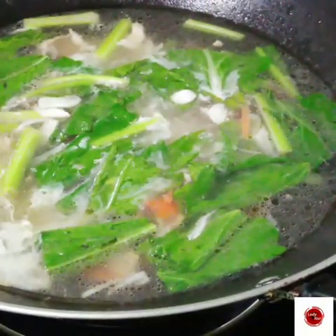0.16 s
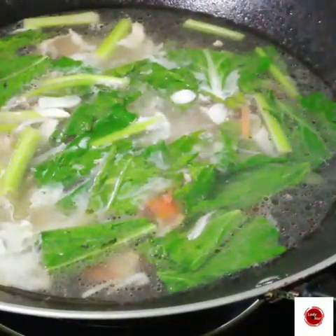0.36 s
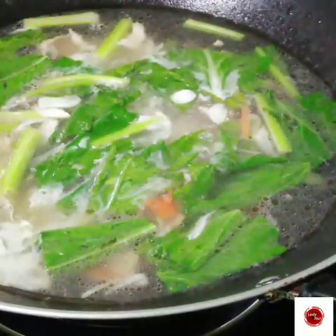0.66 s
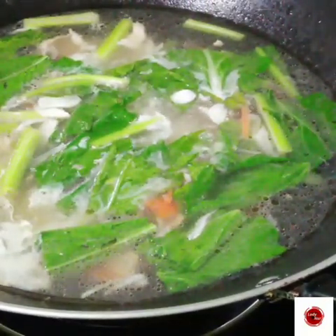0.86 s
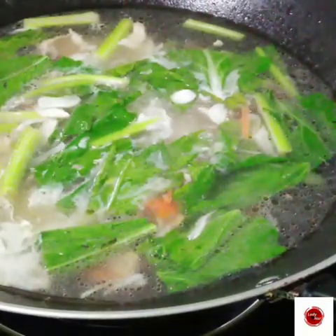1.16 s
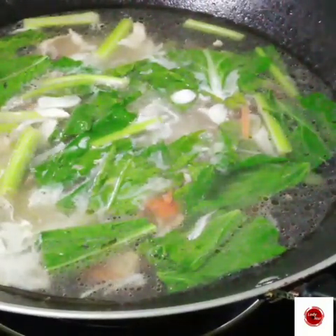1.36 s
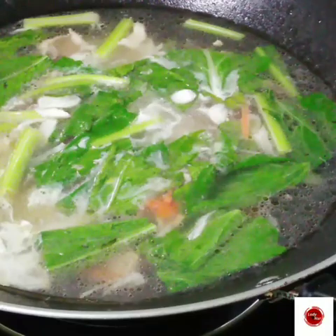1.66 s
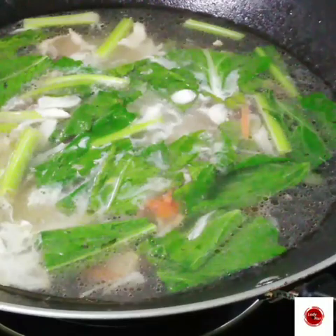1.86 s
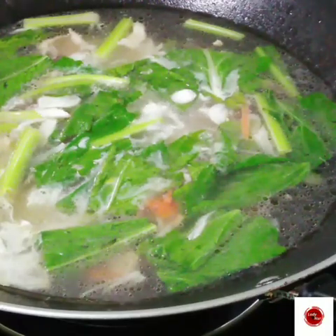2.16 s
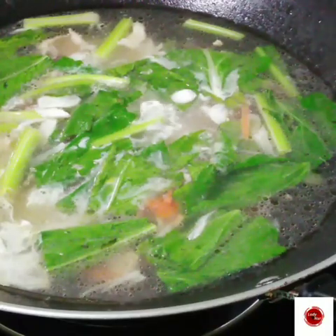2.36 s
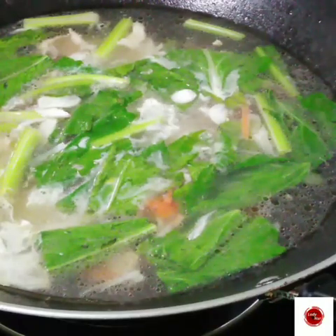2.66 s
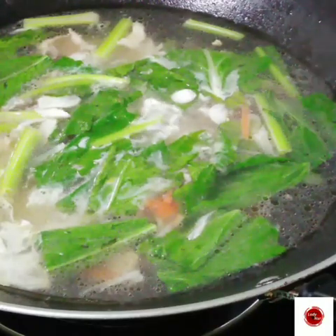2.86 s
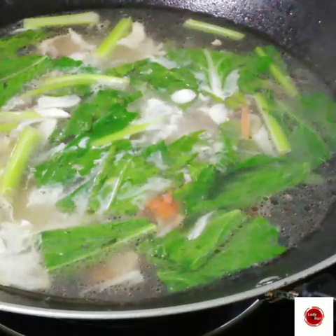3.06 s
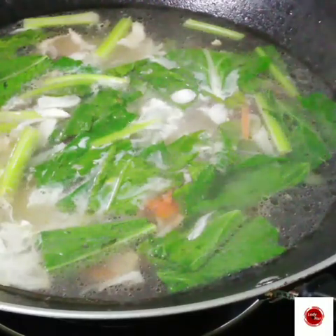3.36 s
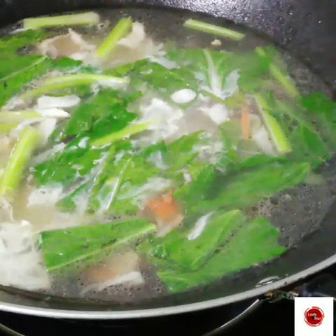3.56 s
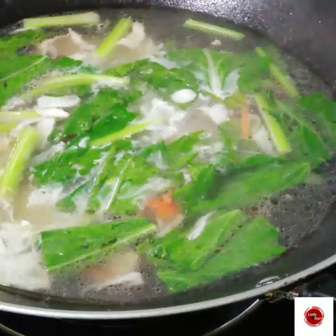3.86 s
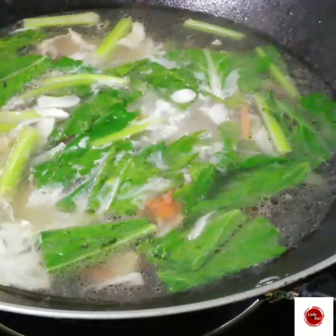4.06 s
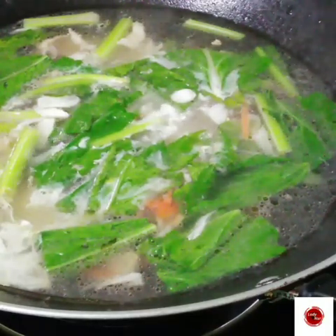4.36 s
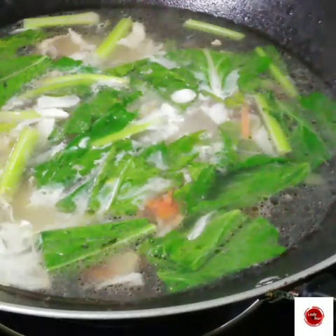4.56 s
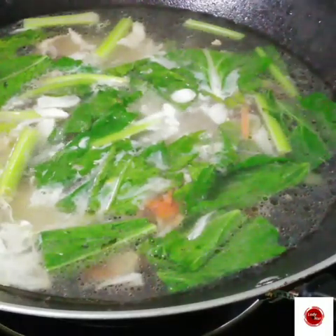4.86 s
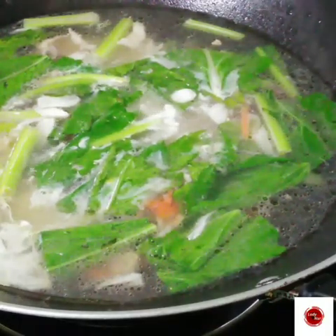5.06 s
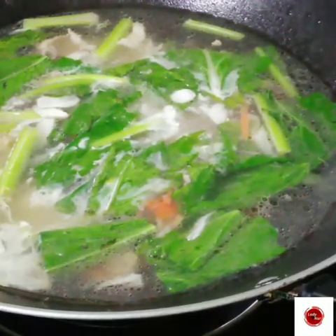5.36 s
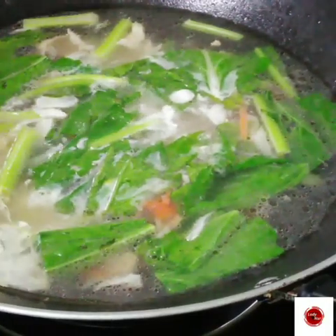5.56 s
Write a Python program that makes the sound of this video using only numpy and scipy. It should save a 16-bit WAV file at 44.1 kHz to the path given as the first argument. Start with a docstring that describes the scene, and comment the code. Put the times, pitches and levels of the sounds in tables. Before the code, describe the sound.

Broth simmers in a pan, spitting and hissing strongly at first, then calming to scattered bubble plops, with a brief rising squeak midway.

```python
"""Simmering broth

Steam hiss surges and spits, dense tiny bubbles fizz and large ones rumble: coloured grainy noise.
Plops are damped sines; a squeak climbs in pitch and a sputter breaks up: roughened tones.
A hum sags early on, a thin whistle wavers late, dry ticks snap and a modal thud lands once.
An even burner hiss and room air lie under it all; sparse taps echo the plops, snaps and thud."""
import sys
import numpy as np
from scipy import signal
from scipy.io import wavfile
from scipy.ndimage import uniform_filter1d

SR = 44100
rng = np.random.default_rng(int(sys.argv[2]) if len(sys.argv) > 2 else 0)


def waveform_to_disk(signal):
    """Save audio, clipped to [-1, 1], as 16-bit WAV at the path in sys.argv[1]."""
    frames = np.transpose(np.atleast_2d(signal))
    scaled = np.clip(frames, -1, 1) * 32767
    samples = np.round(scaled).astype(np.int16)
    wavfile.write(sys.argv[1], SR, samples)


N = 252604

# Noise spectra, relative. Each row: frequency in Hz, density in dB per Hz.
ROOM_COLOUR = [(12, -49), (35, -4), (130, 1.5), (170, -15), (290, -120)]
BURNER_COLOUR = [(600, -30), (770, 6), (920, -24.5), (1800, -17), (2000, 3), (2250, -28), (7000, -36),
                 (7700, -0.5), (8400, 14.5), (9000, -7.5), (9500, -27), (10000, 9), (10400, -35.5),
                 (11500, -75)]
DEEP_COLOUR = [(50, -53.5), (86, 4), (124, -14.5), (173, 2.5), (227, -3.5), (270, -2), (360, -21),
               (470, -36), (790, -120)]
UPPER_COLOUR = [(240, -4), (320, 2.5), (450, 0.5), (560, 2), (720, 4), (860, -2.5), (1000, -10),
                (1300, -17), (2400, -100)]
FIZZ_COLOUR = [(470, -60), (800, 2), (987, -7.5), (1250, 0), (2040, 3.5), (2290, 0), (2750, 1),
               (3910, -5.5), (6500, -4.5), (8450, -56)]
STEAM_COLOUR = [(1760, -37), (3000, -10.5), (3500, -14), (4340, -8.5), (6130, -1), (7700, 7.5), (8520, 6.5),
                (13700, -19), (14600, -16.5)]
# Stereo likeness of the noises. Each row: frequency in Hz, left-right correlation (0-1).
LIKENESS = [(60, 0.985), (130, .98), (290, 0.88), (640, 0.5), (1400, 0.05), (14900, 0.03)]
# Stereo balance of the noises. Each row: frequency in Hz, left over right in dB.
TILT = [(300, 1), (1500, -0.5), (5500, -2.5), (7300, -11.5), (8700, 2.5), (12000, 1.5)]
# Hum level. Each row: time in seconds, level in dB.
HUM = [(0, -47), (.13, -60.5), (.36, -39.5), (.48, -44), (.56, -36), (.62, -35), (.64, -53), (.74, -47.5),
       (.92, -54), (1.0, -51), (1.25, -55)]
# Whistle path. Each row: time in seconds, centre in Hz, level in dB.
WHISTLE = [(5.05, 2990, -58.5), (5.192, 3090, -63), (5.212, 3230, -54), (5.6, 3160, -59),
           (5.728, 3400, -69)]
# Whistle bands. Each row: multiple of the centre, relative level in dB.
WHISTLE_BANDS = [(1, -4.5), (2, -5.5), (2.5, -2)]
# Thud modes. Each row: frequency in Hz, relative level in dB, t60 in seconds.
THUD_MODES = [(120.5, 0.5, 0.2), (167, 7.5, 0.12), (211, 3, 0.11), (298, -2, 0.13), (405, -7, 0.1)]
# Squeak path. Each row: time in seconds, pitch in Hz, level in dB.
SQUEAK = [(3.206, 720, -78), (3.209, 727, -42.5), (3.23, 890, -51), (3.247, 1290, -34), (3.26, 1560, -56),
          (3.28, 1925, -42.5), (3.305, 2060, -46), (3.32, 2152, -41), (3.335, 2244, -48),
          (3.389, 2437, -39)]
# Sputter level. Each row: time in seconds, level in dB.
SPUTTER = [(2.97, -81), (2.99, -48), (3.035, -56), (3.068, -40.5), (3.085, -68), (3.139, -46.5),
           (3.168, -38), (3.19, -72)]
# Snaps of a bursting skin. Each row: start in seconds, level in dB, left over right in dB.
TICKS = [(3.2086, -34, 1.5), (3.839, -31, 3), (4.5125, -31, 6), (4.9553, -38, 2)]
# Plops. Each row: start in seconds, level in dB, pitch in Hz, t60 in seconds, left over right in dB.
PLOPS = [(.676, -20, 433, 0.083, -1), (1.361, -34, 337, 0.045, -6), (1.493, -28, 480, 0.03, -8),
         (1.768, -29, 635, 0.057, -5), (2.278, -31, 640, 0.017, 8.5), (2.284, -26, 717, 0.015, 1),
         (2.305, -26, 669, 0.034, 3), (2.309, -20.5, 564, 0.041, 8), (2.307, -30.5, 1450, 0.035, 12),
         (2.316, -27, 795, 0.026, 3), (2.342, -29.5, 610, 0.016, -7), (2.352, -33, 619, 0.026, -2),
         (2.694, -31, 363, 0.037, 4.5), (2.699, -48, 2020, 0.026, 5), (2.791, -46.5, 2020, 0.031, 0),
         (2.878, -41.5, 347, 0.06, 1), (3.462, -36, 1845, 0.028, 4), (4.207, -41, 1937, 0.052, -17),
         (4.341, -29, 533, 0.043, 2), (4.351, -28.5, 618, 0.047, -2), (4.374, -37, 596, 0.031, 2),
         (4.427, -43.5, 1940, 0.072, 8), (4.881, -36.5, 760, 0.043, 3), (4.899, -36, 797, 0.035, 0),
         (4.9552, -27.5, 1904, 0.015, -3), (4.9555, -34, 696, 0.012, 2), (4.957, -44, 3890, 0.024, 0),
         (5.172, -31.5, 234, 0.023, 5.5), (5.226, -25.5, 1558, 0.037, -2.5), (5.457, -33.5, 684, 0.043, 6)]
# Level of the deep rumble throughout, apart from what the surges add. Each row: time in seconds, level in dB.
DEEP = [(0, -54.5), (.16, -55), (.24, -45), (.71, -41), (.88, -54.5), (1.0, -44), (1.34, -61), (1.53, -51),
        (1.75, -63.5), (2.17, -72.5), (2.24, -62), (2.83, -66.5), (2.91, -56.5), (3.25, -65.5), (3.36, -58),
        (4.3, -63.5), (4.81, -66), (5.1, -76), (5.17, -58), (5.73, -64)]
# Quiet simmer. Each row: time in seconds, then steam, fizz and upper rumble levels in dB.
SIMMER = [(0, -46, -59.5, -51), (.2, -49.5, -53, -58), (.45, -40.5, -48.5, -44), (.92, -47, -56.5, -49),
          (1.2, -46, -54.5, -55.5), (1.45, -59.5, -72.5, -62), (1.7, -52, -68, -59.5),
          (1.986, -58, -82, -60), (2.015, -69, -76.5, -65.5), (2.179, -85, -77, -71),
          (2.4, -51.5, -98, -56.5), (2.66, -64, -107, -69), (2.81, -64.5, -67.5, -70),
          (3.2, -56.5, -66.5, -77), (3.55, -55, -68, -76.5), (3.92, -88, -93, -79.5),
          (4.2, -55.5, -104, -76), (4.72, -65.5, -79, -89), (5.04, -76, -66, -86), (5.3, -59, -63.5, -72),
          (5.73, -79, -90, -70)]
# Surges of the boil. Each row: crest in seconds, rise in seconds, hold in seconds, fall in dB per second,
# steam, fizz and upper rumble levels in dB, left over right of the steam in dB.
SURGES = [(0.218, 0.0083, .005, 192, -40, -54, -40.5, -8.5),
          (0.339, 0.14, 0.0065, 138, -30, -36.5, -37.5, 5),
          (0.517, 0.078, 0.27, 600, -36, -47.5, -42.5, 3.5), (0.99, 0.15, 0.0056, 91, -43, -48.5, -38.5, 2),
          (1.102, 0.51, 0.004, 223, -33, -52, -49, 2.5), (1.365, 0.015, 0.0042, 116, -50, -57, -46.5, 6),
          (1.498, 0.062, 0.054, 228, -51, -43.5, -41.5, 5), (1.76, 0.13, 0.041, 135, -40, -45, -49, 10.5),
          (2.301, 0.068, 0.0027, 133, -41, -44, -52.5, 7), (2.689, 0.044, 0.0074, 385, -56, -57, -53, 8),
          (2.996, 0.12, .16, 264, -58, -51, -54.5, 6.5), (3.286, 0.083, .01, 112, -55, -47, -86, -10),
          (3.454, 0.037, .005, 134, -57.5, -55.5, -75, 16), (3.597, 0.1, 0.0088, 50, -45.5, -60, -91, 11),
          (3.836, 0.0055, 0.039, 456, -71.5, -52, -81, 36), (3.988, 0.16, 0.13, 60, -62.5, -59, -69, -1),
          (4.267, 0.089, 0.045, 91, -43.5, -56.5, -90, 9), (4.333, 0.033, 0.0057, 123, -63, -46, -47, 3),
          (4.509, 0.015, 0.052, 80.5, -53, -50, -60, 0), (4.884, 0.083, 0.0053, 180, -56.5, -57, -51.5, 6),
          (5.052, 0.008, 0.05, 60, -63.5, -66, -75, -7), (5.382, 0.56, 0.0046, 38, -52, -64, -59.5, 9.5),
          (5.57, 0.07, 0.0076, 212, -54.5, -65, -90.5, 11)]
# Sudden spits of steam. Each row: start in seconds, nominal noise peak in dB, t60 in seconds,
# left over right in dB, lower hiss over upper hiss in dB.
SPITS = [(.113, -34, 0.21, 0, 15.5), (0.215, -23.5, 0.26, 1, 7), (0.2927, -26, 0.15, -2, -10),
         (0.326, -18.5, 0.35, 2.5, 12.5), (0.4035, -16, 0.07, -2, -11), (0.506, -19, 0.18, 2, 7),
         (0.542, -25.5, 0.49, 2, 11), (0.629, -15, 0.11, 7, -15), (0.676, -18, 0.31, -1, 2.5),
         (.894, -19, 0.022, -5, -13), (0.9266, -24.5, 0.35, 4, -13), (0.957, -17.5, 0.16, 2, 6),
         (1.0875, -14, 0.099, 0, -9), (1.106, -19.5, 0.13, -1, 4), (1.4283, -26, 0.22, -4, -7),
         (1.487, -21.5, 0.16, 6, -12), (1.515, -20.5, 0.21, 1.5, -14), (1.747, -22, 0.046, 7.5, 3),
         (2.209, -39, 0.25, 13, -18), (2.2336, -34, 0.2, 9, -15), (2.285, -30.5, 0.2, 13, 0),
         (2.945, -35, 0.057, 11, -21), (4.2093, -37, 0.097, -0.5, 14.5), (4.2857, -26, 0.062, 3, 3),
         (4.335, -28.5, 0.16, 13, -5), (4.508, -37.5, 0.35, 9, 4), (5.477, -37, .04, 3, 2),
         (5.576, -28.5, 0.037, 5, 4)]

ROOM_DB, BURNER_DB = -66, -64
HUM_HZ, HUM_SAG_HZ_PER_S = 471, 41
THUD_S, THUD_PEAK_DB = 5.3245, -26
SPUTTER_HZ = 1980
CLEAN_HZ, BROKEN_HZ, CLEAN_SHARE, BROKEN_SHARE = 1810, 1993, 0.36, 1  # break-up grows between the pitches
SWELL_SHARE = 0.1  # plop swell time as a share of t60
RISE_DB = 51.5  # climb of a surge over its rise time
SIMMER_PAN_DB = 8.5  # left over right, steam only
DEEP_SURGE_DB = -16.5  # deep rumble against the upper rumble level
SPIT_FIZZ_DB = -20.5  # fizz of a spit against its lower hiss
LOW_CUT_HZ, EDGE_HZ = 40, 14450
SUPPRESS_SHARE, DEPTH_DB = 0.43, -4.5  # share of quiet power removed; deepest cut


def gain_of(db):
    """Amplitude factor of a level in dB."""
    return 10 ** (np.asarray(db) / 20)


def evened(x):
    """Scale to unit rms."""
    return x / np.sqrt(np.mean(x ** 2) + 1e-20)


def read(points, hz):
    """Interpolate a table over log frequency."""
    f, value = np.transpose(points)
    return np.interp(np.log(hz + 1), np.log(f + 1), value)


def curves(rows):
    """Columns of a time table at every sample."""
    s, *columns = np.transpose(rows)
    return [np.interp(np.arange(N) / SR, s, c) for c in columns]


def panned(db):
    """Left and right gains, db apart."""
    return gain_of(np.array([db / 2, -db / 2]))


def add(mix, s, sound):
    """Mix a stereo sound in at s seconds, cut at the end."""
    part = mix[:, round(s * SR):][:, :sound.shape[1]]
    part += sound[:, :part.shape[1]]


def smooth_noise(shape, width_s):
    """Unit-rms noise averaged over width_s along its last axis."""
    return evened(uniform_filter1d(rng.standard_normal(shape), round(width_s * SR)))


def wash(colour, size, patchy_db, streaky_db, crackle_db, per_s):
    """Stereo noise of sparse ticks over a smooth bed, coloured and patched in short-time spectra."""
    strengths = gain_of(3.5 * np.minimum(rng.exponential(1, (2, N)), 2.2))
    grains = strengths * (rng.random((2, N)) < per_s / SR)
    raw = rng.standard_normal((2, N)) * (1 + gain_of(crackle_db) * evened(grains))
    hz, t, (a, b) = signal.stft(raw, SR, nperseg=size, noverlap=size * 3 // 4)
    same = read(LIKENESS, hz)[:, None]
    z = np.array([a, same * a + np.sqrt(1 - same ** 2) * b])
    z *= panned(read(TILT, hz))[:, :, None]

    cells, thin = rng.standard_normal((len(t), len(hz), 2)).T
    patches = uniform_filter1d(cells, size // 64, axis=0)
    patches = evened(uniform_filter1d(patches, 8192 // size, axis=1))
    streaks = uniform_filter1d(thin, size // 400, axis=0)
    streaks = evened(uniform_filter1d(streaks, 24576 // size, axis=1))
    streaks = np.minimum(streaks, 1.1)  # narrow bands dip deeper than they rise
    patch_db = patchy_db * np.tanh(patches / 2) * 2
    z *= gain_of(read(colour, hz)[:, None] + patch_db + streaky_db * streaks)
    out = signal.istft(z, SR, nperseg=size, noverlap=size * 3 // 4)[1][:, :N]
    return out / np.sqrt(np.mean(out.mean(0) ** 2))  # unit rms of the left-right mean


def tone(rows, waver_hz, flutter_db, grain_s):
    """A sine on a pitch and level path, both wavering at random."""
    hz, db = curves(rows)
    waver, flutter = smooth_noise(N, grain_s), smooth_noise(N, grain_s)
    t = np.arange(N) / SR
    fade_in = np.clip((t - rows[0][0]) / 0.0047, 0, 1)
    fade_out = np.clip((rows[-1][0] - t) / 0.038, 0, 1)
    turns = np.cumsum(hz + waver_hz * waver) / SR
    level = gain_of(db + flutter_db * flutter)
    return np.sqrt(2) * fade_in * fade_out * level * np.sin(2 * np.pi * turns)


def room_air():
    """Still air of the room: low noise at a constant level."""
    return gain_of(ROOM_DB) * wash(ROOM_COLOUR, size=2048, patchy_db=2.5, streaky_db=0.5,
                                   crackle_db=-1, per_s=170)


def burner():
    """Thin burner hiss at a constant level, with two faint lower bands."""
    return gain_of(BURNER_DB) * wash(BURNER_COLOUR, size=1024, patchy_db=1.5, streaky_db=4,
                                     crackle_db=-12, per_s=1500)


def kitchen(x, t60=0.17):
    """Echoes: sparse taps of random sign that die away, drawn separately for each side."""
    t = np.arange(SR // 3) / SR
    signs = rng.choice([-1., 1.], (2, len(t)))
    present = (rng.random((2, len(t))) < .05) * (t > .004)
    taps = signs * present * gain_of(-60 * t / t60)
    return signal.fftconvolve(x, taps / np.linalg.norm(taps[0]), axes=1)[:, :N]


def hum():
    """A wavering tone that sags in pitch."""
    path = [(s, HUM_HZ - HUM_SAG_HZ_PER_S * s, db) for s, db in HUM]
    return tone(path, waver_hz=9.3, flutter_db=3.5, grain_s=0.025)


def whistle():
    """Fast-wavering sines smear into thin hissy bands at fixed ratios, drawn separately for each side."""
    bands = [[(s, k * hz, db + rel_db) for s, hz, db in WHISTLE] for k, rel_db in WHISTLE_BANDS]
    return np.array([sum(tone(rows, waver_hz=85.6, flutter_db=4.5, grain_s=0.005) for rows in bands)
                     for side in "LR"])


def thud():
    """One soft blow on a few low damped modes."""
    out, t = np.zeros((2, N)), np.arange(SR // 3) / SR
    ring = sum(gain_of(db - 60 * t / t60) * np.sin(2 * np.pi * hz * t) for hz, db, t60 in THUD_MODES)
    soft = ring * (1 - np.exp(-(t / 0.0018) ** 2))
    add(out, THUD_S, gain_of(THUD_PEAK_DB) * np.array([soft, soft]) / abs(soft).max())
    return out


def squeak(rows, chop_s=.0018):
    """Air escapes through a closing gap: noise chops the note more the higher its pitch."""
    note = tone(rows, waver_hz=15, flutter_db=.8, grain_s=.004)
    broken = np.interp(curves(rows)[0], [CLEAN_HZ, BROKEN_HZ], [CLEAN_SHARE, BROKEN_SHARE])
    return note * (np.sqrt(1 - broken ** 2) + broken * smooth_noise((2, N), chop_s))


def sputter():
    """The same broken note held at one pitch, in bursts."""
    return squeak([(s, SPUTTER_HZ, db) for s, db in SPUTTER])


def ticks(width_s=.00009):
    """A skin bursts: one short push and pull of air each."""
    out, u = np.zeros((2, N)), np.arange(200) / SR / width_s
    pulse = u * (2 - u) * np.exp(-u) * 2
    for s, db, pan_db in TICKS:
        add(out, s, panned(pan_db)[:, None] * gain_of(db) * pulse)
    return out


def plops(rise_per_s=4.4, splash_db=-9, splash_s=0.00086):
    """A bubble swells, rings at a slightly rising pitch, roughened by its splash, and dies."""
    out, t = np.zeros((2, N)), np.arange(SR // 5) / SR
    splashes = smooth_noise((len(PLOPS), 2, len(t)), splash_s)
    for (s, db, hz, t60, pan_db), splash in zip(PLOPS, splashes):
        swell = 1 - np.exp(-(t / (SWELL_SHARE * t60)) ** 2)
        shape = gain_of(db - 60 * t / t60) * swell
        ring = np.sin(2 * np.pi * hz * (t + rise_per_s * t ** 2 / 2))
        add(out, s, panned(pan_db)[:, None] * shape * (1 + gain_of(splash_db) * splash) * ring)
    return out


def surges():
    """Levels of steam, fizz and upper rumble: each surge climbs, holds and falls over the quiet simmer."""
    t = np.arange(N // 32 + 2) * 32 / SR  # every 32nd sample
    s, *quiet = np.transpose(SIMMER)
    hiss, froth, upper = (gain_of(np.interp(t, s, db)) ** 2 for db in quiet)  # powers
    hiss = hiss * panned(SIMMER_PAN_DB)[:, None] ** 2
    for crest, rise, hold, fall, hiss_db, fizz_db, upper_db, pan_db in SURGES:
        climb_db = -RISE_DB * np.maximum(crest - t, 0) / rise
        fall_db = -fall * np.maximum(t - crest - hold, 0)
        power = gain_of(climb_db + fall_db) ** 2
        hiss = hiss + power * (gain_of(hiss_db) * panned(pan_db)[:, None]) ** 2
        froth = froth + power * gain_of(fizz_db) ** 2
        upper = upper + power * gain_of(upper_db) ** 2
    left, right, froth, upper = (np.interp(np.arange(N) / SR, t, np.sqrt(v))
                                 for v in (*hiss, froth, upper))
    return np.array([left, right]), froth, upper


def spits(crest_db=12):
    """Levels of upper hiss, lower hiss and fizz: each spit jumps up, then dies away."""
    (hiss, low), t = np.zeros((2, 2, N)), np.arange(SR // 3) / SR
    for s, peak_db, t60, pan_db, low_db in SPITS:
        rms_db = peak_db - crest_db  # noise peaks stand above the rms
        shape = gain_of(rms_db - 60 * t / t60) * (1 - np.exp(-t / 0.001))
        burst = panned(pan_db)[:, None] * shape
        add(hiss, s, burst)
        add(low, s, gain_of(low_db) * burst)
    return hiss, low, gain_of(SPIT_FIZZ_DB) * low


def boil(surge, spat):
    """Large bubbles collapse under the surface: a deep and an upper rumble."""
    deep = wash(DEEP_COLOUR, size=2048, patchy_db=2.5, streaky_db=3, crackle_db=-13, per_s=200)
    upper = wash(UPPER_COLOUR, size=1024, patchy_db=2, streaky_db=4.5, crackle_db=-11, per_s=230)
    upper_level = np.sqrt(surge ** 2 + (gain_of(-31) * spat.mean(0)) ** 2)
    deep_level = np.sqrt(gain_of(curves(DEEP)[0]) ** 2 + (gain_of(DEEP_SURGE_DB) * surge) ** 2)
    return deep_level * deep + upper_level * upper


def fizz(surge, spat):
    """Small bubbles burst densely, louder in surges and spits."""
    level = np.sqrt(surge ** 2 + spat ** 2)
    return level * wash(FIZZ_COLOUR, size=1024, patchy_db=2.5, streaky_db=7, crackle_db=-8, per_s=1200)


def steam(surge, spat, spat_low):
    """Hiss follows surges and spits; above about 10 kHz it is turned down where the level is low."""
    level = np.sqrt(surge ** 2 + spat ** 2)
    low_level = np.sqrt(surge ** 2 + spat_low ** 2)
    hiss = wash(STEAM_COLOUR, size=512, patchy_db=2.2, streaky_db=4.6, crackle_db=-5, per_s=1500)
    top = signal.sosfiltfilt(signal.butter(6, 10300, "high", fs=SR, output="sos"), hiss)
    low = signal.sosfiltfilt(signal.butter(4, 6000, fs=SR, output="sos"), hiss)
    strength = level.mean(0) / gain_of(-59)
    cut_top = top / (1 + strength ** 2)
    return level * (hiss - low - cut_top) + low_level * low


def scene():
    """Sum the background, the single events with their echoes, and the boil."""
    background = room_air() + burner() + hum() + whistle()
    blow = thud()
    near = squeak(SQUEAK) + sputter() + ticks() + plops()
    echoes = gain_of(-5) * kitchen(near) + gain_of(-0.5) * kitchen(blow).mean(0)
    jet, bubbling, rumble = surges()
    spit_hiss, spit_low, spit_froth = spits()
    broth = boil(rumble, spit_froth) + fizz(bubbling, spit_froth) + steam(jet, spit_hiss, spit_low)
    return background + blow + near + echoes + broth


def record(dry):
    """Cut the low bass, suppress what is near each band's quiet level, then limit the band."""
    dry = signal.sosfilt(signal.butter(4, LOW_CUT_HZ, "high", fs=SR, output="sos"), dry)
    z = signal.stft(dry, SR, nperseg=1024)[2]
    power = uniform_filter1d(abs(z) ** 2, size=3, axis=2)
    power = uniform_filter1d(power, size=3, axis=1) + 1e-20
    quiet = np.percentile(power, 20, axis=2, keepdims=True)
    kept = np.maximum(1 - SUPPRESS_SHARE * quiet / power, gain_of(DEPTH_DB) ** 2)
    dry = signal.istft(z * np.sqrt(kept), SR, nperseg=1024)[1][:, :N]
    band_limit = signal.firwin(511, EDGE_HZ, window=("kaiser", 9), fs=SR)
    return signal.oaconvolve(dry, band_limit[None], "same")


dry = scene()
out = record(dry)
waveform_to_disk(out)
```